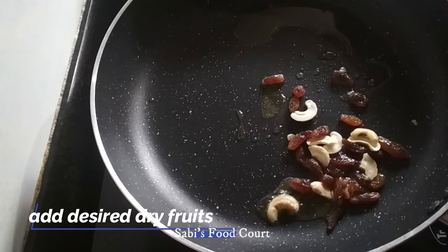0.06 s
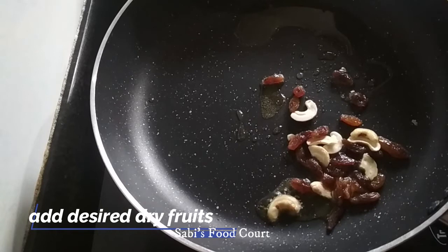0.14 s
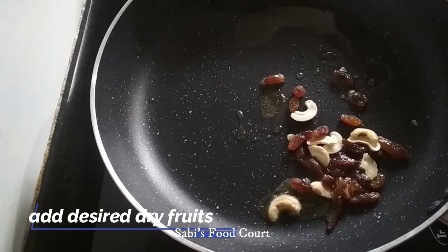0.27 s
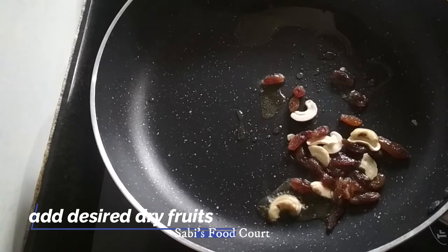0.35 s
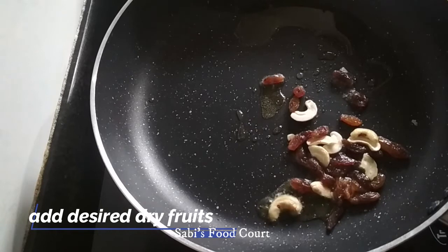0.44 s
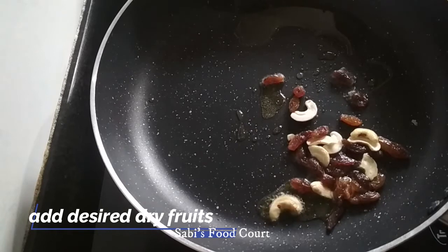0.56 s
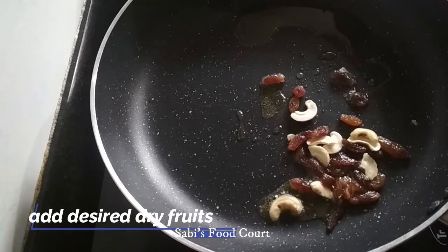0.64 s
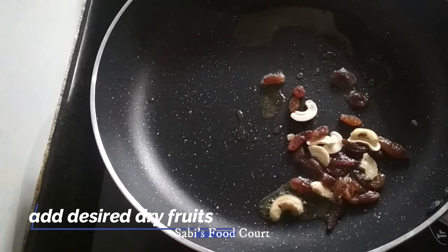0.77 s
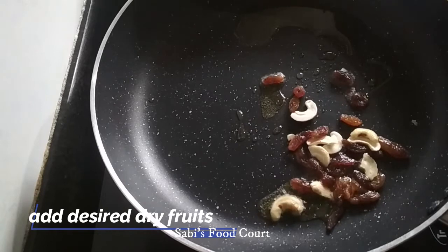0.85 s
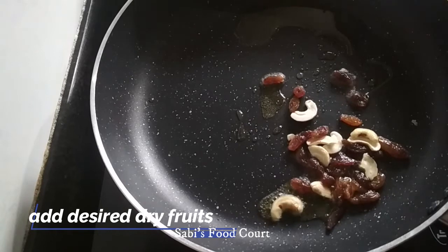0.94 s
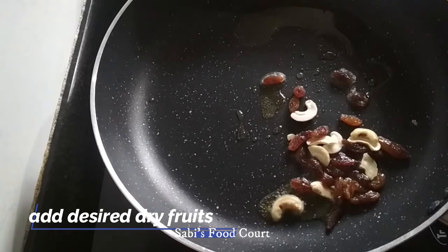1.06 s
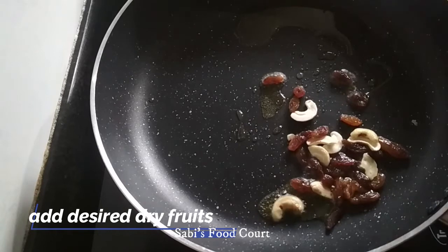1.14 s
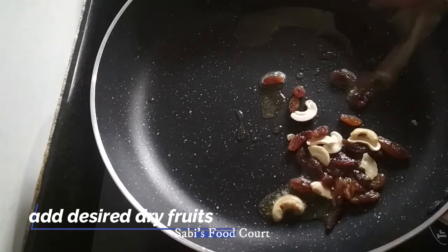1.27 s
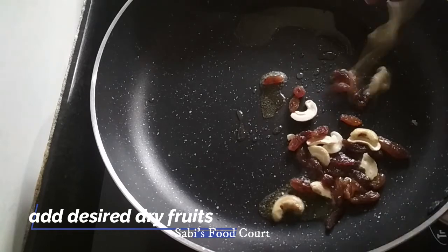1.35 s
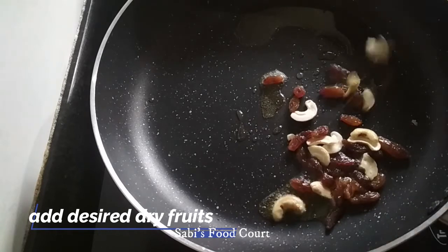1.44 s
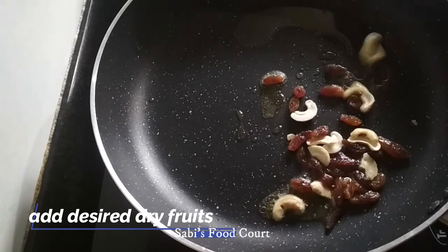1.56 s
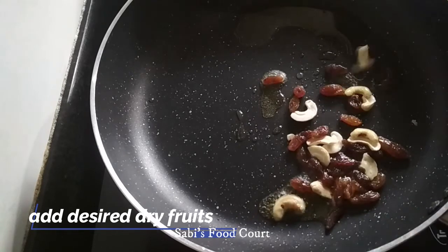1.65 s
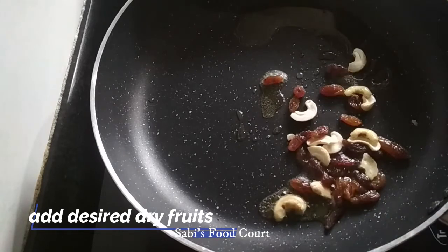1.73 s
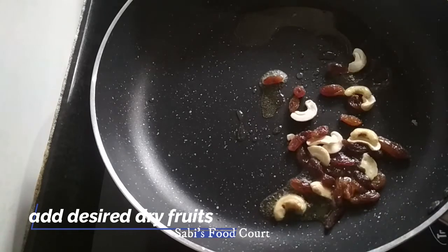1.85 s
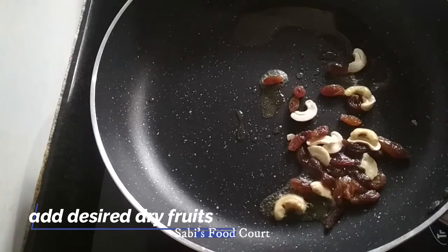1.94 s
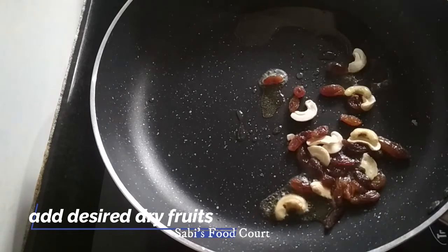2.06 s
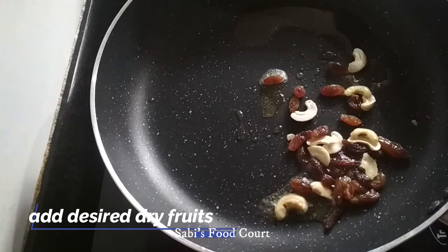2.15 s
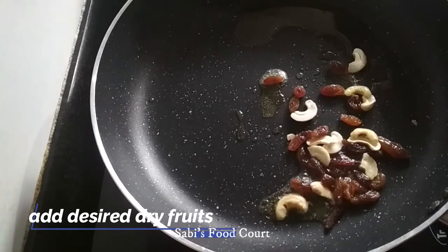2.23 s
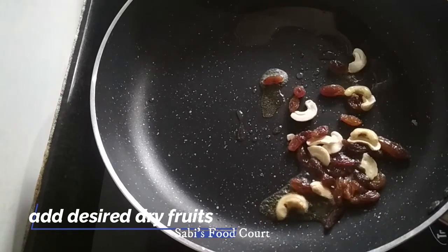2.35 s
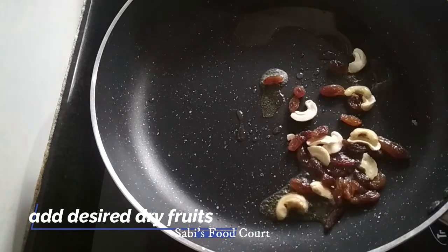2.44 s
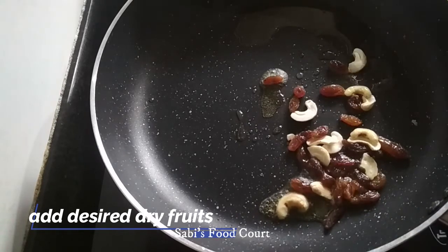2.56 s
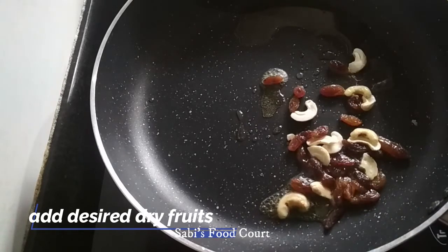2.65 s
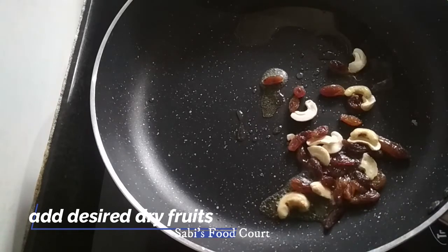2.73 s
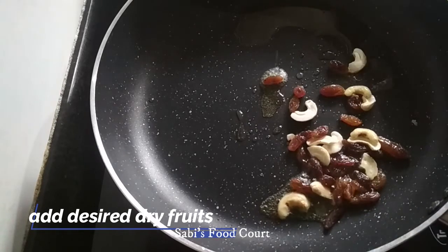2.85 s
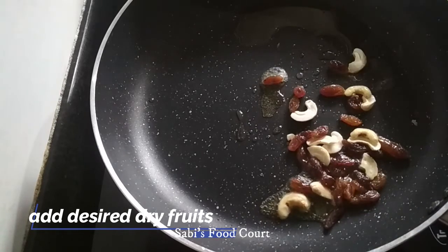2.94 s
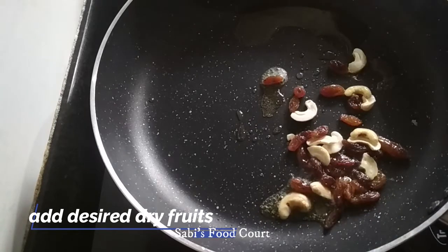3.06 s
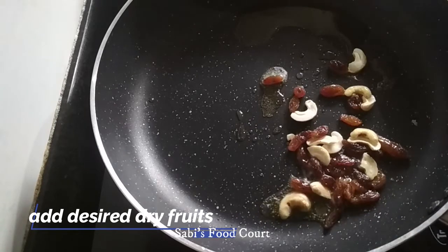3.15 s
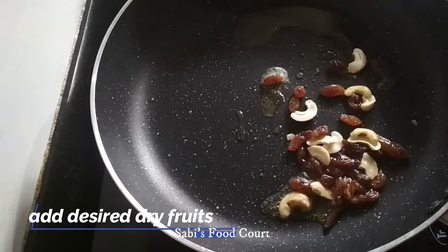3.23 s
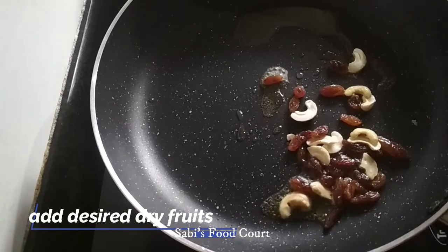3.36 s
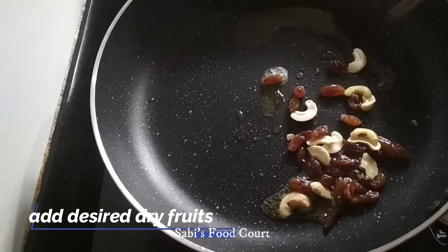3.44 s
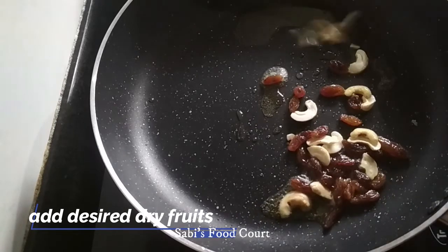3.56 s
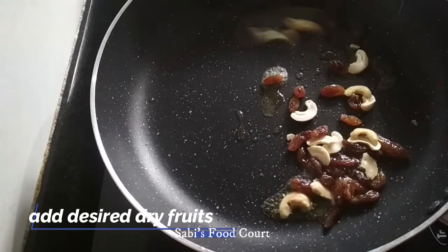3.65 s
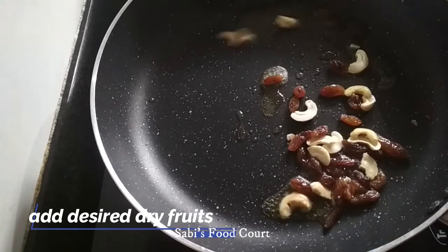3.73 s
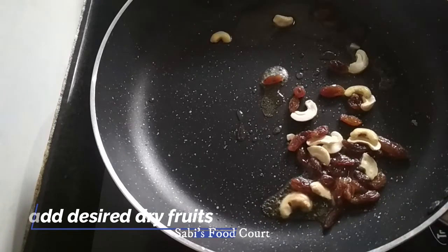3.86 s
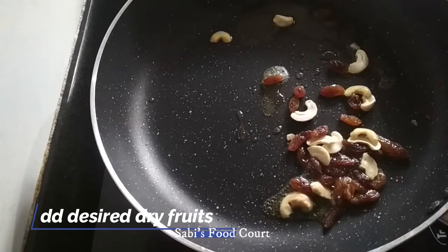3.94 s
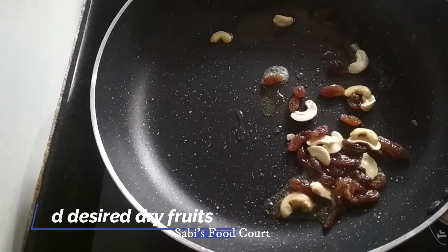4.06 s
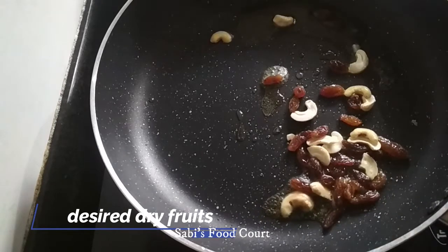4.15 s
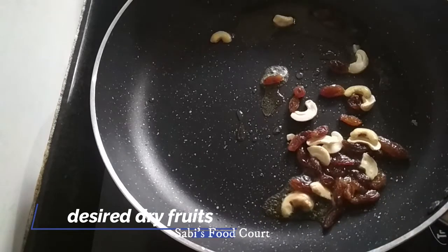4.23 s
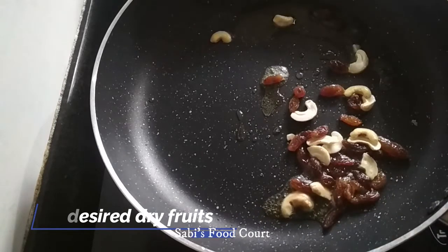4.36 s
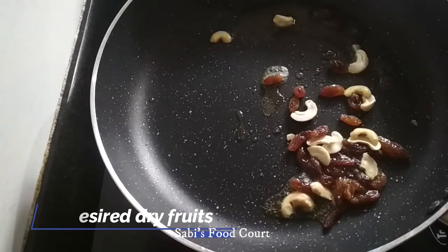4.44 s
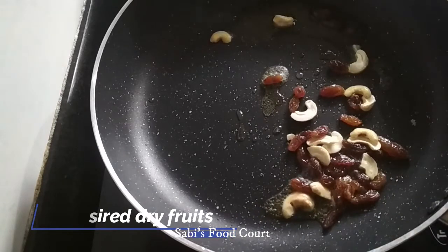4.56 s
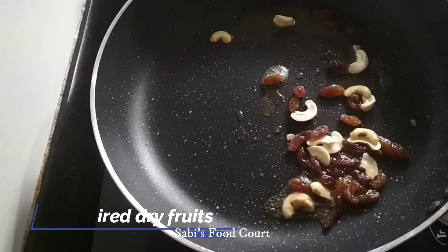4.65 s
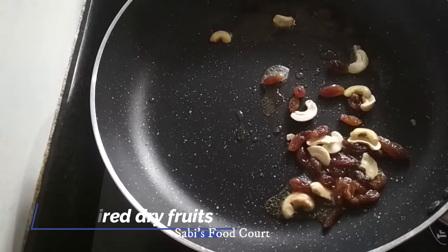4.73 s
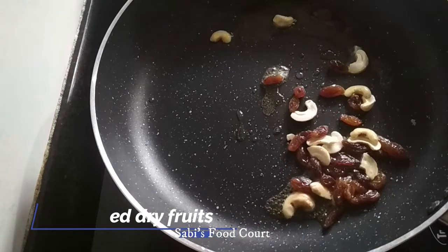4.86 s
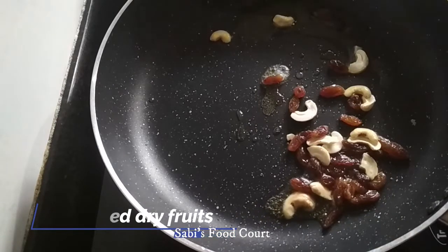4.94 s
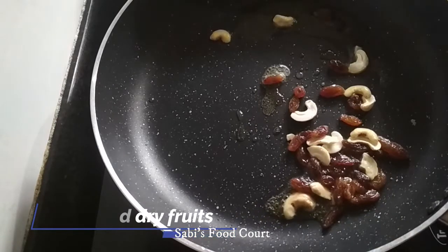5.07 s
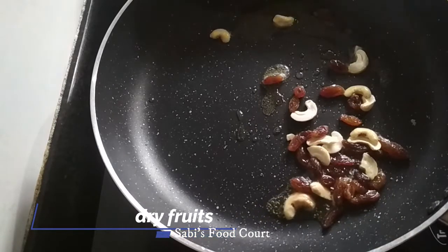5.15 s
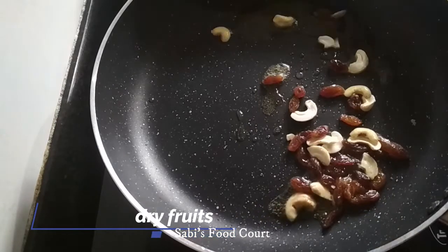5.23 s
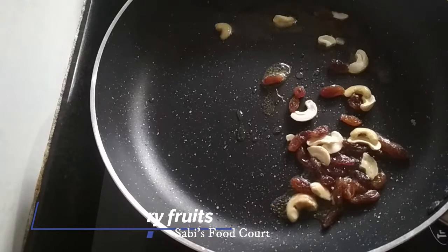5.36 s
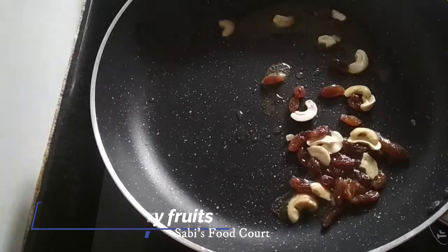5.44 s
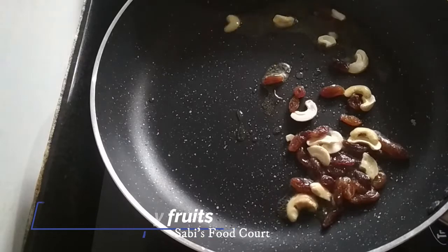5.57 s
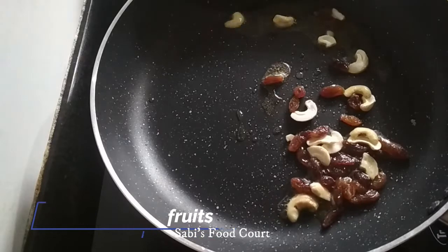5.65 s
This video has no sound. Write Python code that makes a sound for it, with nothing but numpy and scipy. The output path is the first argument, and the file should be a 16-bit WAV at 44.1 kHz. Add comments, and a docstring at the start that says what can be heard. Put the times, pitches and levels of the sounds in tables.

```python
"""Nuts and dried fruit fry in hot fat, close under a phone's two microphones, left and right.
From the start, noise and tiny grains fizz brightly on the left, which faces the pan; bursting bubbles
ring the pan's modes, heard most on the shaded right. Sharp one-sided spits (pressure blips), noisy cracks
and low thumps (pressure that flips) soon join on the left, with a hum that comes and goes. From 0.6 s a few
dull bumps of low noise sound farther off; just after 5.1 s everything stops dead and silence follows."""
import sys
import numpy as np
from scipy import signal
from scipy.fft import rfft, irfft
from scipy.io import wavfile
from scipy.ndimage import uniform_filter1d

SR = 44100
rng = np.random.default_rng(int(sys.argv[2]) if len(sys.argv) > 2 else 0)


def store_wav(level_fs):
    """Save 16-bit WAV to argv[1]."""
    pcm = np.round(np.clip(np.atleast_2d(level_fs), -1, 1) * 32767)
    wavfile.write(sys.argv[1], SR, pcm.T.astype(np.int16))


N = 251278

# All levels below are mix levels, ahead of the filters and the rounding of peaks.
# Overall fizz and small-bubble levels along the scene: (time [s], fizz level [dB], small-bubble level [dB])
FRYING_LEVELS = [(0, -18.5, -23.5), (.3, -20, -31.5), (.8, -21, -26), (1.3, -19.5, -27), (1.7, -19, -25.5),
                 (2.5, -20, -25), (3.2, -18.5, -26), (4, -21.5, -27.5), (4.4, -20, -26), (5.1, -20, -28)]
# Sudden dips of the level under fizz and small bubbles; negative depths are lifts: (time [s], depth [dB])
LEVEL_DIPS = [(.05, 5), (.35, 4.5), (.75, 2), (.782, 7.5), (1.28, 4.5), (1.335, -1), (1.39, 5), (1.49, 2),
              (1.78, 4.5), (1.89, 3.5), (2.32, 2), (2.59, 6), (2.95, 6.5), (3.115, 6.5), (3.245, 2.5),
              (3.43, 3), (3.52, 2.5), (3.92, -2.5), (4.07, 1.5), (4.645, 3.5), (4.95, 1)]
# Colour of the fizz, relative: (frequency [Hz], left density [dB per Hz], right density [dB per Hz])
FIZZ_COLOUR = [(2110, -9.5, -0.5), (3100, -16.5, -1), (4000, -14.0, -10), (5700, -13.5, -10),
               (7900, -10.5, -7.5), (9200, -8.5, -7.5), (10100, -2.5, -8), (9800, -17.5, -12.5),
               (10610, -3.5, -0.5), (11680, 0.8, -2.4), (12620, 0.7, 2), (14000, -0.5, -4.5),
               (16100, -3, -30.5)]
# Modes of the pan, relative levels: (frequency [Hz], left level [dB], right level [dB], base t60 [s])
PAN_MODES = [(404.4, -8.5, 8, 0.034), (556, -18.5, 1.5, 0.048), (618, -24.5, 1, 0.16),
             (746, 0.5, -3, 0.045), (835.6, 1, -3.5, 0.079), (1053, -9.5, -5.5, 0.035),
             (1158, 4.5, 6, 0.033), (1252, -0.5, 4.5, 0.045), (1394, -23.5, 9, 0.027), (1584, 1, 3, 0.063),
             (1614, 6, -8.5, 0.0057), (1890, -2, -9, 0.023), (2090, -4, -22, 0.044),
             (2243, -10.5, -26.5, 0.032), (2760, -6, -7, .02), (3420, -13, -21.5, .03),
             (4450, -11, -30.5, .02)]
# Bursts and falling nuts that ring the pan:
# (time [s], right peak [dB], centre of the blow [Hz], left lean [dB], ring length [factor on t60])
PAN_BLOWS = [(.0066, -2.5, 1240, 0, 1.8), (0.0333, -6, 1340, -2, 1), (0.1319, -1.5, 1390, -10, 0.84),
             (.1734, -12, 1350, -11, 1.2), (.303, -14, 1250, -4, 1), (0.4279, -6, 1370, 3, 0.63),
             (0.4828, -4.5, 1310, -7, 0.51), (.5996, -13.5, 807, 0.5, 1.4), (.611, -10.5, 776, -4, 2.2),
             (0.625, -3.5, 1225, -3, 0.68), (0.6495, -12, 1210, 2, 1.8), (0.678, -8, 1315, -8.5, .68),
             (1.235, -18, 1310, 6, 1.1), (1.3295, -9.5, 1480, 2, 0.61), (1.3822, -9.5, 1600, 1.5, 2.8),
             (1.4529, -11.5, 1490, -3, 4.6), (1.481, -4.2, 1720, 6.4, 1.6), (1.6, -12, 1690, 2.5, 2.1),
             (1.6814, -8.5, 1290, -18, 1.4), (1.713, -12, 1350, -14, 1.1), (1.7542, -8, 1320, -14, 1.7),
             (1.7825, -16, 1350, -21, 4.3), (1.8782, -11, 1510, -2, 1.6), (1.9489, -10, 1380, -6, .87),
             (2.0123, -8.5, 1250, 5, 0.79), (2.0382, -9.5, 1610, -5, 1.3), (2.18, -6.5, 1070, -1.5, 0.6),
             (2.2028, -12.5, 1040, 10, 1.1), (2.2182, -12, 1320, -4, 1.2), (2.2742, -15, 1400, -13, 0.82),
             (2.3962, -11, 1340, -5, .43), (2.4419, -9.5, 1400, -12, 0.78), (2.5125, -18, 1405, -8.5, 1.5),
             (2.546, -13, 1460, -6, 2.2), (2.5759, -13, 1210, 3, 3.4), (2.7347, -19, 1350, -4.5, 0.48),
             (2.785, -16, 1610, 6, 1.7), (2.8758, -11, 1355, -16, .41), (2.892, -18, 1330, -2, 1.2),
             (2.9086, -12, 1330, 4, 1.1), (2.9536, -15, 1390, 9, 0.7), (3.1093, -4.5, 1260, -2, 0.61),
             (3.3335, -10.5, 1380, -5, .96), (3.5354, -11.5, 1730, -2, 1.6), (3.593, -6, 1320, -13, 2.6),
             (3.611, -11, 1250, -7.5, 1.3), (3.6136, -4.5, 1140, -1, 0.54), (3.652, -8.5, 1620, -11, 2.2),
             (3.7024, -6.5, 1210, 4.7, 1), (3.9686, -11.5, 1540, -12, 1.1), (3.979, -12, 1560, -6, 1.4),
             (4.0051, -8, 1350, -1, 0.74), (4.062, -14, 1507, -7, 0.6), (4.0803, -10, 1350, -2, 1.2),
             (4.2822, -4.5, 1350, -12.5, 0.6), (4.297, -13, 1250, 1, 1.3), (4.381, -10.5, 1180, 1, 1.2),
             (4.5066, -11.5, 1407, -6.5, 1.1), (4.5228, -13, 1470, -6.5, 1.9),
             (4.7127, -11.5, 1264, -1, 0.63), (4.7347, -14, 1380, -6, 2.1),
             (4.8966, -11.5, 1265, -18, 0.91), (4.9784, -8.5, 1510, -9, 1.6),
             (5.0292, -10, 1280, -14, 0.91), (5.0404, -13, 1220, 2, 1.6)]
# One-sided spits at the left microphone: (time [s], signed blip peak [linear])
LOUD_SPITS = [(0.054, -0.28), (0.0716, -0.49), (0.0871, 0.56), (0.2553, 0.44), (0.2723, 0.54),
              (0.3447, -0.34), (0.4191, -0.54), (0.4831, 0.95), (0.4938, 0.8), (0.514, 0.44),
              (0.5326, -0.51), (0.554, 0.45), (0.586, 0.37), (0.602, 0.13), (0.6048, -0.25),
              (0.6202, -0.35), (0.6562, 0.6), (0.6847, -0.18), (0.6956, 0.41), (0.7332, 0.66),
              (0.7734, 0.093), (0.8254, 0.24), (0.8945, 0.45), (0.938, 0.31), (0.9615, 0.55),
              (0.9647, -0.39), (1.028, 0.6), (1.0362, 0.42), (1.0413, 0.5), (1.0847, 0.46), (1.1072, -0.4),
              (1.1265, 0.81), (1.1883, -0.4), (1.2481, 0.48), (1.252, 0.29), (1.2743, -0.55), (1.288, 0.73),
              (1.415, -0.34), (1.5127, 0.56), (1.5378, 0.55), (1.5493, 0.66), (1.598, 0.16), (1.625, 0.3),
              (1.6341, 0.65), (1.6565, 0.62), (1.6783, 0.41), (1.6846, -0.43), (1.6938, 0.52),
              (1.7169, 0.56), (1.7831, 0.81), (1.788, 0.32), (1.8924, 0.44), (2.0003, -0.67),
              (2.1062, 0.052), (2.154, 0.36), (2.1716, 0.53), (2.2034, -0.86), (2.2062, -0.4),
              (2.2148, 0.42), (2.2747, 0.52), (2.2867, 0.62), (2.3791, 0.74), (2.4066, -0.25),
              (2.4582, 0.44), (2.4606, 0.57), (2.4718, 0.58), (2.4952, 0.32), (2.5093, 0.54),
              (2.5149, -0.58), (2.5253, -0.5), (2.5751, -0.43), (2.6118, 0.59), (2.624, -0.38),
              (2.6282, 0.37), (2.742, 0.26), (2.7653, 0.3), (2.865, 0.56), (2.9091, 0.5), (2.9474, 0.57),
              (2.9541, 0.6), (3.0856, -0.45), (3.096, -0.39), (3.109, 0.054), (3.115, 0.69), (3.165, 0.58),
              (3.2184, 0.32), (3.2356, 0.15), (3.3142, 0.73), (3.3421, -0.78), (3.357, 0.25),
              (3.4067, -0.14), (3.4089, 0.46), (3.412, 0.68), (3.5133, 0.67), (3.6454, -0.49),
              (3.689, 0.76), (3.7057, 0.12), (3.7112, -0.43), (3.8243, 0.37), (3.837, 0.4), (3.846, 0.49),
              (3.8735, -0.15), (3.9045, 0.64), (3.9176, -0.31), (3.923, 0.58), (3.9851, 0.81),
              (4.0074, 0.43), (4.062, -0.39), (4.0851, 0.61), (4.122, 0.71), (4.1376, 0.19), (4.173, -0.35),
              (4.1876, 0.37), (4.2146, 0.58), (4.245, 0.5), (4.268, -0.67), (4.29, -0.32), (4.303, 0.42),
              (4.396, -0.34), (4.4145, -0.49), (4.5114, 0.51), (4.5304, 0.34), (4.6027, 0.27),
              (4.646, -0.7), (4.6636, 0.29), (4.7216, 0.27), (4.7472, 0.31), (4.769, -0.13), (4.8175, 0.3),
              (4.9372, 0.56), (5.0096, 0.56), (5.0146, 0.31), (5.0404, 0.57), (5.1014, 0.41)]
# Bright cracks of larger bubbles:
# (time [s], left starting level [dB], centre [Hz], left over right [dB], t60 [s], sharpness [Q])
BUBBLE_CRACKS = [(.0935, -14, 8500, 14.5, 0.014, 1.3), (.4165, -26, 6270, 13, .012, 2.5),
                 (.483, -24, 8450, 5, .010, 1.4), (0.752, -4, 8870, 17, 0.0047, 0.67),
                 (.7716, -24, 7340, 15, 0.016, 2.5), (.838, -17, 8510, 12, 0.009, 0.88),
                 (1.2082, -32, 8750, 13, .012, 1.4), (1.4800, -16, 3100, 5, 0.034, 2.8),
                 (2.4358, -22, 5900, 15, 0.032, 7.5), (2.445, -12, 5900, 6, 0.0071, 7.5),
                 (2.954, -16, 3210, 4, 0.007, 3.5), (2.954, -31, 9500, 8.5, 0.012, .8),
                 (3.109, -14, 8150, 17, 0.014, 0.75), (3.6815, -23, 8080, 14, .012, 1.4),
                 (3.984, -14, 8620, 15, 0.023, 1.4)]
# Pressure thumps at the left microphone, before a slight smoothing:
# (time [s], push [signed peak, linear], rebound [signed peak, linear], build-up [ms])
PRESSURE_THUMPS = [(0.0407, 0.1, 0.37, 2.5), (0.0943, 0.15, -.21, 1), (0.16, 0.053, -0.3, 4),
                   (0.356, -0.14, 0.23, 2.5), (0.3937, 0.23, -0.26, 0.82), (.4917, 0.3, -0.31, 3.3),
                   (0.753, 0.4, -0.16, 3.5), (.7803, 1, -0.25, 3.3), (0.8385, 0.11, -0.37, 2),
                   (1.1964, -0.22, 0.12, 3), (1.3142, 0.31, -0.051, 1.4), (1.3881, -0.53, .18, 2.7),
                   (1.6373, -.32, 0.087, 3.5), (2.361, 0.26, -0.31, 2.2), (2.598, -0.084, .32, 1.4),
                   (2.849, 0.37, -0.17, 3), (3.1195, 0.42, -0.38, 3.5), (3.2421, 0.43, -.5, 4.5),
                   (3.3088, -0.14, 0.011, 2.9), (4.282, -0.049, 0.16, 2.5), (4.327, 0.17, -0.11, 3.7),
                   (4.383, -0.2, 0.19, 5), (4.5846, 0.073, -0.24, 3.4), (4.6453, -0.02, -0.18, 1)]
# Swells of the low hum: (start [s], hold [s], relative level [dB])
HUM_SWELLS = [(.043, 0.074, -25), (.357, 0.087, -35), (.495, .2, -33), (.785, 0.14, -29),
              (1.197, 0.045, -25), (1.39, .07, -29), (1.638, 0.04, -27.5), (2.6, 0.12, -37.5),
              (2.95, .2, -34), (3.245, 0.11, -28.5), (4.283, 0.11, -25), (4.585, .03, -39)]
# Dull far bumps at both microphones: (time [s], level [dB])
FAR_BUMPS = [(.6, -42), (1.54, -42), (2.22, -57), (2.495, -28.5), (2.75, -31.5), (4.955, -24), (5.0, -33)]

DROP_S, RECOVER_S = 0.008, 0.11  # fall time and recovery time constant of a dip
BUBBLE_SHARE = 0.87  # the small bubbles follow this share of each dip
WIDEST, WIDEST_HZ, NARROWING = 0.38, 1220, 0.33  # blows far from this centre cover fewer modes (log Hz)
EASE_MS, EASE_SHARE = 1.3, 0.55  # the rebound eases off in a fixed time plus a share of the build-up time
HUM_HZ, HUM_STEADY = 99.7, 0.57  # the second is the weight of the steady tone, the rest is rough
SWELL_S, FADE_DB_PER_S = 0.008, 222.5
HUM_FLOOR_DB, HUM_RIGHT_DB = -49, -38  # level between swells; right relative to left
BUMP_RISE_S, BUMP_T60_S, BUMP_LEFT_DB = 0.013, 0.42, 0.5
STOP_S = 5.1378
EDGE_HZ = 15800


def amp(db):
    """Turn decibels into a linear gain."""
    return 10 ** (np.asarray(db) / 20)


def evened(x):
    """Scale to an RMS of one."""
    return x / np.sqrt(np.mean(x ** 2, axis=-1, keepdims=True) + 1e-20)


def curve(table, column):
    """Draw straight lines through one column of a table along time."""
    rows = np.array(table)
    return np.interp(np.arange(N) / SR, rows[:, 0], rows[:, column])


def add(mix, s, sound):
    """Lay a sound into the mix at a time in seconds, cut off at the end."""
    part = mix[..., max(round(s * SR), 0):][..., :sound.shape[-1]]
    part += sound[..., :part.shape[-1]]


def clicks(per_s, spread_db, count, most=3.7):
    """Share a rate of random clicks among several trains, mostly small, a few large."""
    size = amp(spread_db * np.minimum(rng.exponential(1, (count, N)), most))
    return size * (rng.random((count, N)) < per_s / count / SR)


def dips_db():
    """The level dips suddenly at set times, within milliseconds, and each dip recovers exponentially."""
    t = np.arange(N) / SR
    total = 0
    for s, depth_db in LEVEL_DIPS:
        fall = np.clip((t - s) / DROP_S, 0, 1)
        recovery = np.exp(-np.maximum(t - s, 0) / RECOVER_S)
        total = total + depth_db * fall * recovery
    return -total


def fizz():
    """Thousands of tiny bubbles a second over a smooth hiss, coloured for each microphone."""
    grains = clicks(5000, 2.74, count=2) * rng.choice([-1, 1], (2, N))
    drive = 0.68 * evened(grains) + 0.6 * rng.standard_normal((2, N))
    hz, _, spectrum = signal.stft(drive, SR, nperseg=512)
    at, *sides_db = np.transpose([(400, -16.5, -48.0)] + FIZZ_COLOUR)
    colour_db = np.array([np.interp(np.log(hz + 1), np.log(at), side) for side in sides_db])

    # uneven patches in time and frequency roughen the noise, less in the highest treble
    patches = uniform_filter1d(rng.standard_normal(spectrum.shape), size=5, axis=2)
    patches = evened(uniform_filter1d(patches, size=2, axis=1))
    patch_depth_db = np.interp(hz, [3000, 8000, 12000], [4.8, 4.8, 1.6])[:, None]
    gain_db = colour_db[..., None] + patch_depth_db * np.minimum(patches, 0.9)
    sound = signal.istft(spectrum * amp(gain_db), SR, nperseg=512)[1][:, :N]

    # both sides flicker together
    flicker_db = 0.97 * evened(uniform_filter1d(rng.standard_normal(N), 260))
    level_db = curve(FRYING_LEVELS, 1) + dips_db() + flicker_db
    return evened(sound) * amp([[6], [-15]]) * amp(level_db)


def ring(centre_hz, lean_db, length, chance):
    """One blow on the pan: decaying modes, strongest near its centre, with chance sizes and phases."""
    hz, left_db, right_db, t60 = np.transpose(PAN_MODES)
    t = np.arange(3500) / SR
    width = WIDEST * np.exp(-(np.log(centre_hz / WIDEST_HZ) / NARROWING) ** 2)
    near = np.exp(-0.5 * (np.log(hz / centre_hz) / width) ** 2) + 0.092
    size = near * (1 + 0.12 * chance[0])
    decay = amp(-60 * t / (max(length, 0.2) * t60[:, None]))
    envelope = decay * (1 - np.exp(-t / 0.000095))
    phase = 2 * np.pi * hz[:, None] * t + 0.93 * chance[1][:, None]
    lag = 4.88 * np.log(hz[:, None] / 1100)  # modes reach the two microphones out of step
    left = size * amp(left_db + lean_db) @ (envelope * np.sin(phase + lag))
    right = size * amp(right_db) @ (envelope * np.sin(phase))
    return np.array([left, right]) / abs(right).max()


def pops():
    """Loud bursts ring the pan over a patter of small ones spread across its modes."""
    loud = np.zeros((2, N))
    chances = rng.standard_normal((len(PAN_BLOWS), 2, len(PAN_MODES)))
    for (s, db, *blow), chance in zip(PAN_BLOWS, chances):
        add(loud, s, amp(db) * ring(*blow, chance))

    trains = clicks(260, 2.4, count=16, most=3.2) * rng.choice([-1, 1], (16, N))
    centres = np.geomspace(600, 2100, 16)  # Hz
    shares = np.exp(-0.5 * (np.log(centres / 1350) / 0.36) ** 2)
    chances = rng.standard_normal((16, 2, len(PAN_MODES)))
    small = np.zeros((2, N))
    for train, hz, share, chance in zip(trains, centres, shares, chances):
        blow = ring(hz, -4, 0.8, chance)
        small += signal.oaconvolve(share * train[None], blow, axes=1)[:, :N]
    small_db = curve(FRYING_LEVELS, 2) + BUBBLE_SHARE * dips_db()
    both = loud + small / small[1].std() * amp(small_db)
    return signal.lfilter(*signal.butter(2, 330, "high", fs=SR), both)


def spits():
    """Each spit is a quarter-millisecond pressure blip with a burst of treble riding on it."""
    small = clicks(300, 4.99, count=1, most=3.4)[0]
    train = amp(-26.5) * small * rng.choice([-1, 1], N)
    for s, peak in LOUD_SPITS:
        train[round(s * SR)] = peak
    t = np.arange(-40, 41) / SR
    blip = np.convolve(train, np.exp(-0.5 * (t / 0.00011) ** 2), "same")
    burst = np.convolve(abs(train), np.exp(-0.5 * (t / 0.00012) ** 2), "same")
    treble = signal.lfilter(*signal.butter(2, 10000, "high", fs=SR), rng.standard_normal(N))
    left = blip + amp(-17) * burst * treble
    echo = signal.lfilter(*signal.iirpeak(1350, 1.6, fs=SR), blip)  # reaches the right side as a short ring
    return np.array([left, amp(-9.0) * echo])


def cracks():
    """Larger bubbles crack as short decaying bursts of noise, each around its own pitch."""
    out, t = np.zeros((2, N)), np.arange(1200) / SR
    noises = rng.standard_normal((len(BUBBLE_CRACKS), 2, 1200))
    for (s, db, hz, left_over_right_db, t60, q), noise in zip(BUBBLE_CRACKS, noises):
        band = signal.lfilter(*signal.iirpeak(hz, max(q, 0.6), fs=SR), noise)
        decay = amp(db - 60 * t / t60)
        add(out, s, evened(band) * decay * amp([[0], [-left_over_right_db]]))
    return out


def thumps():
    """Pressure builds for a few milliseconds, flips in an instant and eases back."""
    out, ms = np.zeros(N), np.arange(1, 1001) / SR * 1000
    for s, push, rebound, build_ms in PRESSURE_THUMPS:
        ease_ms = EASE_MS + EASE_SHARE * build_ms
        build = push * np.exp(-(ms / max(build_ms, 0.3)) ** 2.5)
        ease = rebound * np.exp(-(ms / max(ease_ms, 0.3)) ** 1.8)
        add(out, s - 1000 / SR, np.concatenate([build[::-1], ease]))  # the flip falls at s
    out = uniform_filter1d(out, size=14)
    # mostly the flip reaches the right side
    edge = signal.lfilter(*signal.butter(2, [800, 1900], "band", fs=SR), out)
    return np.array([out, amp(-22.0) * edge])


def hum():
    """A steady tone and rough low noise swell, hold and fade, almost wholly on the left."""
    hz, t = np.fft.rfftfreq(N, 1 / SR), np.arange(N) / SR
    level = amp(HUM_FLOOR_DB)
    for s, hold, db in HUM_SWELLS:
        fade = amp(db - FADE_DB_PER_S * np.maximum(t - s - hold, 0))
        level = level + fade * np.clip((t - s) / SWELL_S, 0, 1)
    tone = np.sqrt(2) * np.sin(2 * np.pi * HUM_HZ * t)
    # a narrow peak at the hum's pitch over a broad low skirt
    shape = 1 / (1 + ((hz - HUM_HZ) / 14) ** 2) + amp(-18.5) / (1 + (hz / 350) ** 2)
    rough = evened(irfft(rfft(rng.standard_normal(N)) * shape, N))
    blend = HUM_STEADY * tone + (1 - HUM_STEADY) * rough
    return blend * level * amp([[0], [HUM_RIGHT_DB]])


def bumps():
    """Far bumps: low noise swells quickly and dies away, nearly alike on both sides."""
    noise, t = rng.standard_normal((3, N)), np.arange(N) / SR
    mostly_shared = noise[:2] + 2.5 * noise[2]
    low = evened(signal.lfilter(*signal.butter(2, [70, 135], "band", fs=SR), mostly_shared))
    level = amp(-61.5)  # faint bed between bumps
    for s, db in FAR_BUMPS:
        decay = amp(db - 60 * np.maximum(t - s, 0) / BUMP_T60_S)
        level = level + decay * np.clip((t - s) / BUMP_RISE_S, 0, 1)
    return low * level * amp([[BUMP_LEFT_DB], [0]])


def scene():
    """Sum all layers, left and right."""
    return fizz() + pops() + cracks() + spits() + thumps() + hum() + bumps()


def record(dry):
    """The microphones drop the deepest bass, peaks round off, the sound stops, then the band limit."""
    dry = signal.filtfilt(*signal.butter(2, 40, "high", fs=SR), dry, padtype="even", padlen=2000)
    rounded = 1.01 * np.tanh((abs(dry) / 0.88) ** 3) ** (1 / 3) * np.sign(dry)
    stopped = rounded * np.clip((STOP_S - np.arange(N) / SR) / 0.0009, 0, 1)
    band_limit = signal.firwin(511, EDGE_HZ, window=("kaiser", 9), fs=SR)
    return signal.oaconvolve(stopped, band_limit[None], "same")


dry = scene()
out = record(dry)
store_wav(out)
```